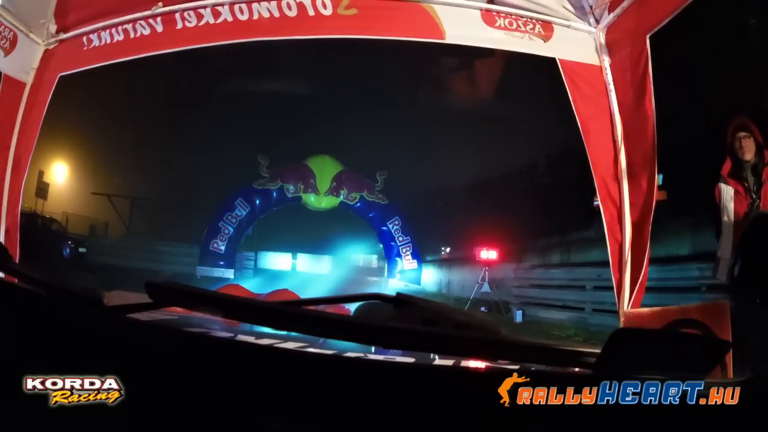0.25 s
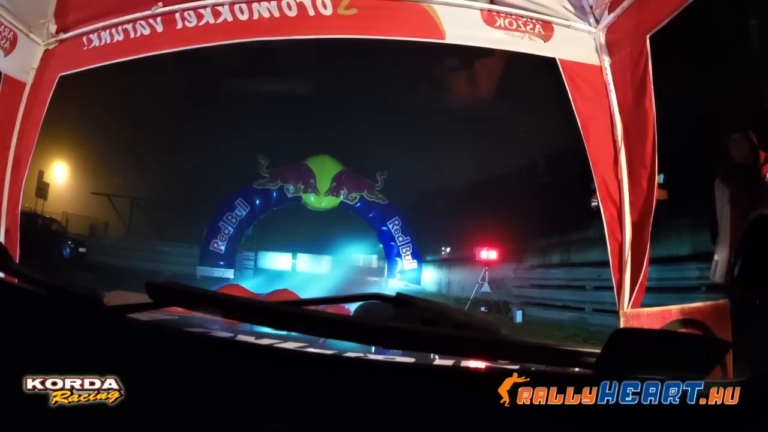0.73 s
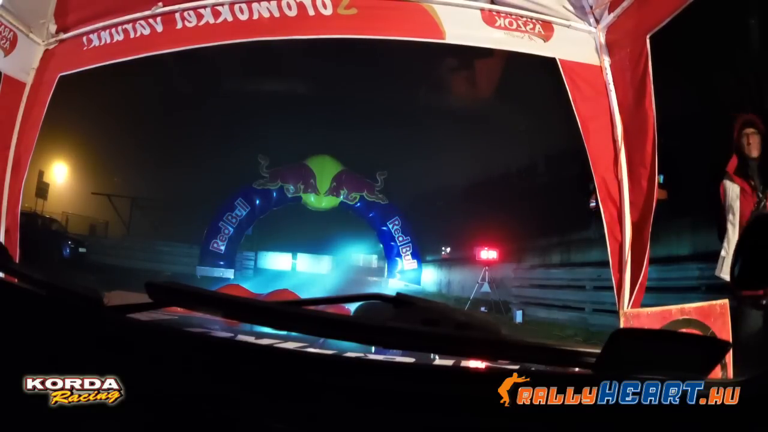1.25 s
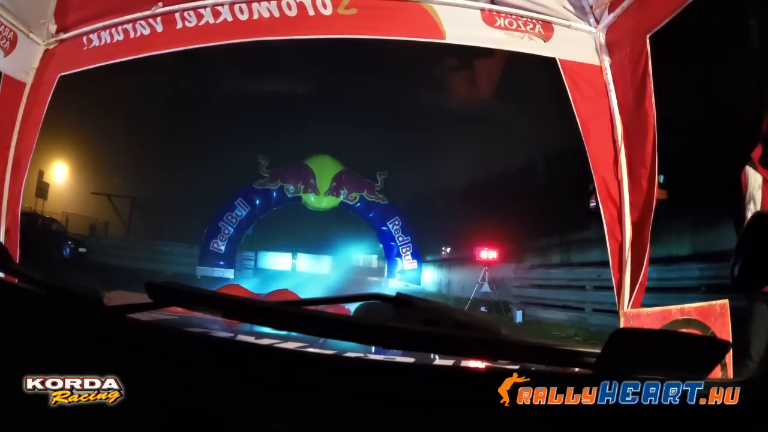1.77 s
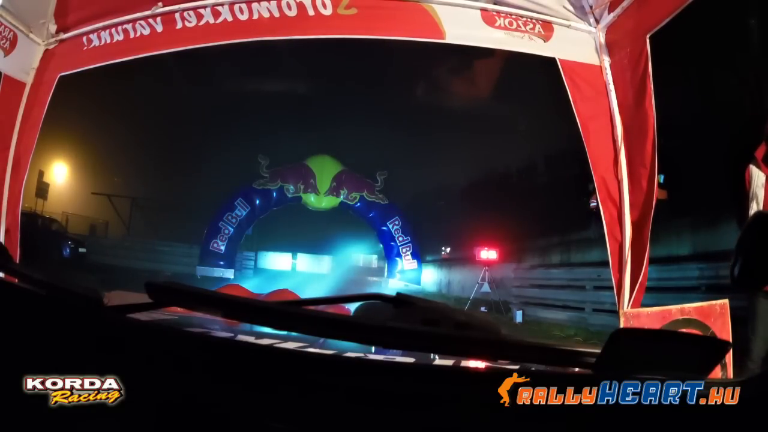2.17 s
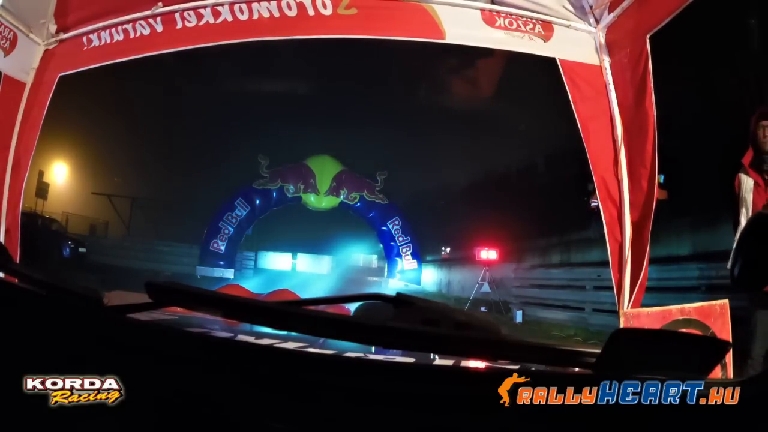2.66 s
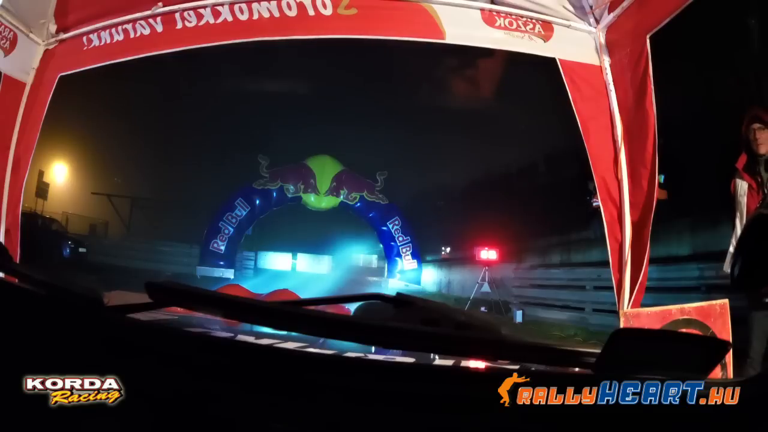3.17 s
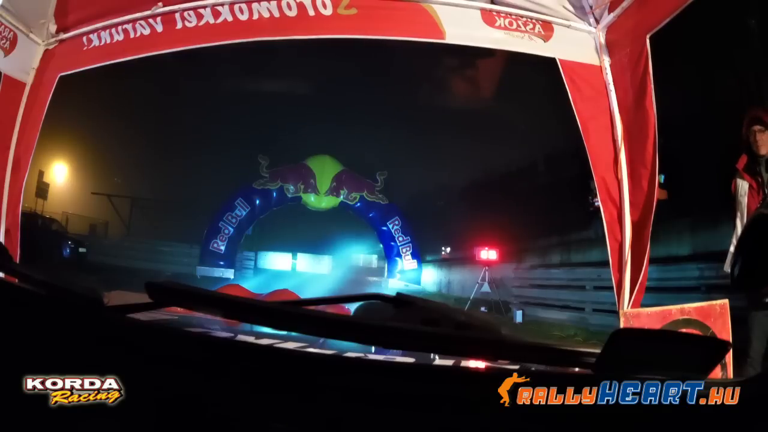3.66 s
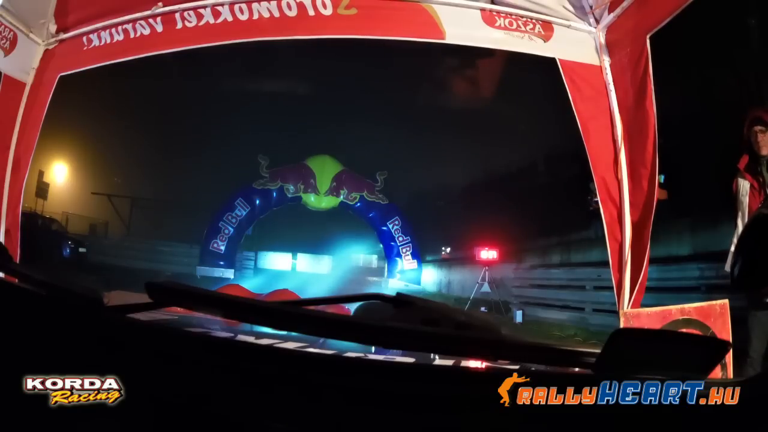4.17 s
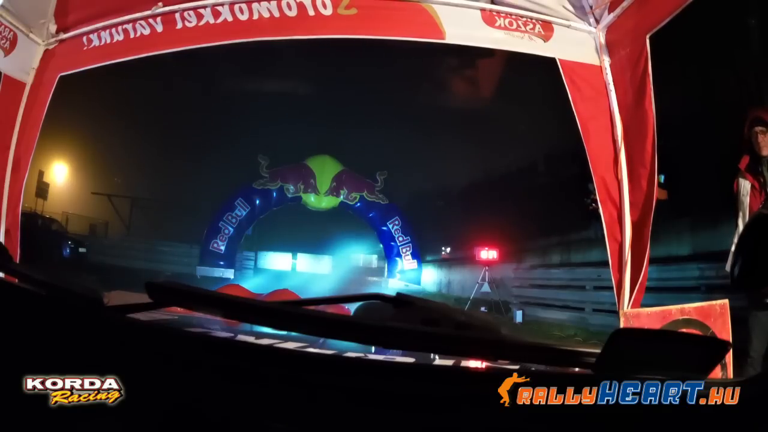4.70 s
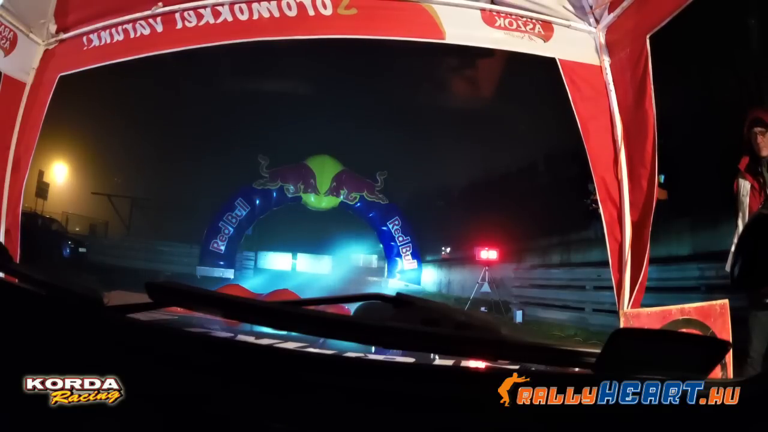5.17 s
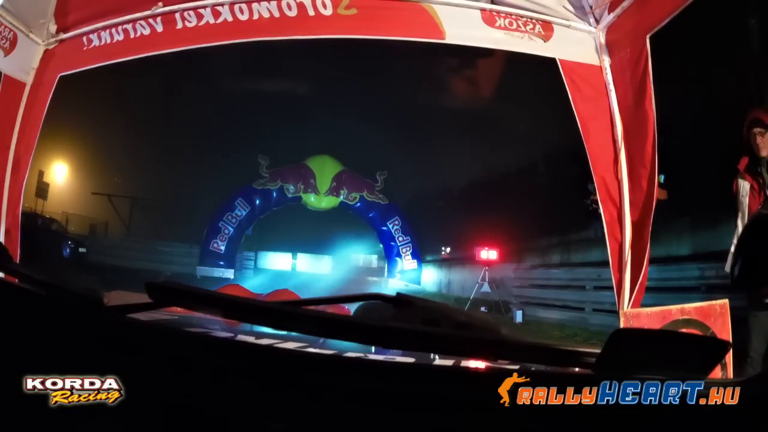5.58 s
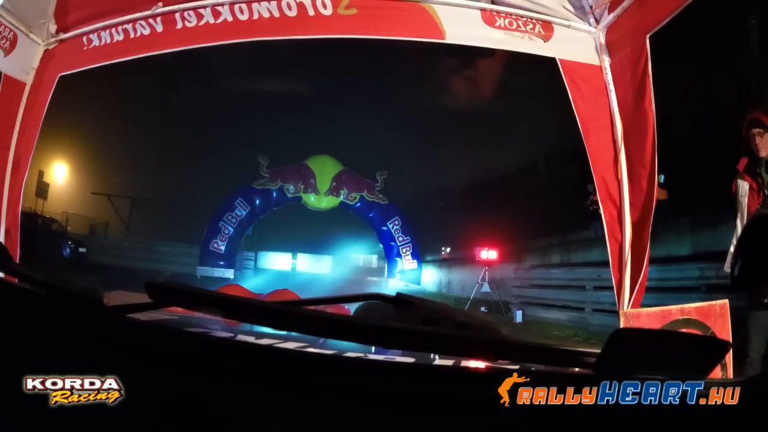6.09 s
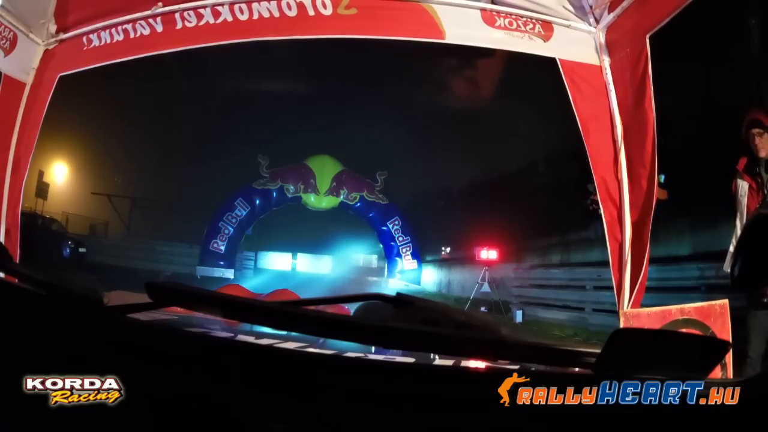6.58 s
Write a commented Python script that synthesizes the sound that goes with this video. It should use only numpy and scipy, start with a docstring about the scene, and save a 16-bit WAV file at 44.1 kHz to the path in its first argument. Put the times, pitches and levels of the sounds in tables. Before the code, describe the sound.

Inside a stationary rally car, a booming four-cylinder engine revs up and sags repeatedly, ending in a flat-out rev with loud backfires.

```python
"""Four-cylinder rally engine at the start line, heard inside the car's bare cabin.
Six throttle blips, then full throttle into the launch limiter; unburnt fuel pops and crackles.
The exhaust booms through the shell, upper orders ring the panels, valves and gears tick.
Faint intake whistle, ringing fittings and hiss lie behind. Peaks overload the microphone."""
import sys
import numpy as np
from scipy import signal
from scipy.fft import next_fast_len
from scipy.io import wavfile
from scipy.ndimage import uniform_filter1d, map_coordinates

SR = 44100
rng = np.random.default_rng(int(sys.argv[2]) if len(sys.argv) > 2 else 0)


def store_wav(level_fs):
    """Save 16-bit WAV to argv[1]."""
    pcm = np.round(np.clip(np.atleast_2d(level_fs), -1, 1) * 32767)
    wavfile.write(sys.argv[1], SR, pcm.T.astype(np.int16))


N = 301644
TIME = np.arange(N) / SR

# Throttle: t_open/s, climb/s, top firing rate/Hz, effort/dB, paired misfire share, t_run_down/s
BLIPS = [(0.0, 0.2, 212.4, -3.5, 0.2, 0.76), (1.05, .245, 238, 0, .7, 2.004),
         (2.2, .29, 222.2, -3.5, 0.1, 3.09), (3.325, .25, 233.5, -1.5, 0.9, 4.28),
         (4.425, .2, 231, -0.5, 0.4, 5.33), (5.41, .22, 236.2, -0.5, .8, 6.335)]
# Final opening: as BLIPS, without t_run_down
LAUNCH = (6.41, .3, 281, 2.0, 0.45)
# Coasting, two firings per crank turn: (t - t_run_down)/s, firing rate/Hz
RUN_DOWN = [(-.72, 239), (-.6, 219), (-.52, 206), (-.45, 206), (-.39, 195), (-.3, 180), (-.23, 175),
            (-.14, 154), (-.03, 141.5), (.04, 140), (.13, 123), (.3, 103)]
# Cabin response to the firing tone and its octave: firing rate/Hz, level/dB
BOOM_BY_RATE = [(103, -20.5), (112, -18), (124, -17.5), (136, -22), (143, -15), (154, -15), (166, -20),
                (173, -26), (180, -20), (191, -14.5), (201, -18), (218, -15), (238, -11), (272, -15)]
OCTAVE_BY_RATE = [(103, -23), (128, -17.5), (136, -17.5), (141, -23), (156, -29), (167, -20.5), (178, -22),
                  (190, -35), (215, -35.5), (238, -24), (272, -37)]
# Lope and bulkhead growl, throttle shut: firing rate/Hz, level/dB
LOPE_BY_RATE = [(103, -24), (126, -23.5), (135, -30), (150, -20.5), (178, -21.5), (192, -17.5),
                (207, -13.5), (238, -14.5)]
GROWL_BY_RATE = [(103, -30.5), (121, -34), (131, -22.5), (139, -29.5), (153, -27), (163, -22), (175, -26.5),
                 (192, -26.5), (215, -20.5), (238, -24)]
# Uneven firing: firing-rate multiple, level/dB (one weak cylinder), level/dB (every other one weak)
LOPE_ORDERS = [(.25, -12, -17.5), (.5, -5, 6.5), (.75, 5, -7), (1.25, -5, -8.5), (1.5, 1.5, -4.5),
               (1.75, -1.5, -6)]
# Upper orders: firing-rate multiple, level/dB
GROWL_ORDERS = [(2.5, 0.5), (3, 6.5), (3.5, -1), (4, 3.5), (4.5, -1.5), (5, 4.5), (5.5, -1.5), (6, 3.5),
                (6.75, 6), (7, 1), (7.5, 2.5), (8, 2), (9, 3), (10, 3.5), (11, 5.5), (12, 4.5)]
# Fuel firing in the exhaust: t/s, crack/dB, length/s, thump/dB
POPS = [(0.194, -39, .015, -14), (1.27, -30, .02, -22), (1.294, -23, .017, -10), (1.306, -20, 0.022, -14),
        (1.382, -33.5, .015, -13), (1.419, -33.5, .016, -11.5), (1.529, -31.5, 0.014, -15.5),
        (2.211, -39, .015, -20), (2.263, -31, .025, -13.5), (2.418, -46, .015, -14),
        (3.57, -37, 0.016, -11.5), (3.609, -22.5, .015, -9), (3.706, -22.5, 0.017, -3.5),
        (3.769, -27, 0.0085, -34.5), (3.797, -44, .015, -9), (4.644, -28, .014, -18.5),
        (4.71, -28, 0.014, -23), (4.82, -34, 0.014, -14), (5.523, -45, .015, -16.5),
        (5.616, -28, 0.027, -8.5), (5.754, -25, .02, -8.5), (5.869, -34, 0.0081, -10),
        (6.548, -40.5, .015, -16), (6.596, -14, .023, -12.5), (6.636, -19, 0.031, -4.5),
        (6.671, -11, .024, -28), (6.685, -7.5, .026, -14), (6.72, -22, .012, -37), (6.734, -8.5, .025, -18),
        (6.758, -6, 0.029, -12.5), (6.786, -6, 0.028, -11), (6.811, -7, 0.039, -10)]
# Resonances of cabin panels and small metal fittings: f/Hz, width/Hz, level/dB
PANEL_MODES = [(441.6, 9.1, 8.5), (524, 32, 5.5), (580.6, 14, 5.5), (682.6, 45, 5), (753, 15, 7),
               (795, 30, 7.5), (887, 16, 2.5), (961, 50, 5.5), (1040, 20, 2.5), (1041, 3.3, 6.5),
               (1072, 62, 7), (1220, 16, 4), (1247, 12, 4.5), (1325, 55, 7), (1537, 41, 3), (1629, 38, 9),
               (2150, 28, 6), (2183, 14, 2.5), (2556, 51, 5.5), (3588, 69, 10), (3860, 120, 6.5)]
FITTING_MODES = [(7700, 140, 7), (7990, 110, 0), (11490, 90, -2), (11800, 90, 2)]
# Spectral shapes: f/Hz, level/dB
LOPE_SPECTRUM = [(20, -16), (45, -19.5), (70, -10.5), (108, -5.5), (126, -7.5), (148, -1), (175, -6),
                 (250, 5.5), (305, -2.5), (338, 3), (368, -9.5), (550, -26), (1200, -72)]
GROWL_SPECTRUM = [(150, -47), (300, -5.5), (400, 2), (500, -3), (760, 0), (860, -4), (1080, -6),
                  (1350, -8.5), (1430, -14), (1620, -14.5), (1900, -23.5), (2800, -35.5), (5000, -69)]
POP_SPECTRUM = [(60, -22.5), (300, 3), (700, 3), (1300, -2), (2000, -7.5), (3800, -19.5), (5000, -30),
                (6500, -38.5), (9000, -60)]
SNAP_SPECTRUM = [(2000, -32), (4000, -4), (7000, -6), (11000, 3), (16000, -5)]
CLATTER_SPECTRUM = [(800, -23), (1700, 4), (2050, 0), (2600, 1), (3200, -4.5), (3700, -9), (4200, -21),
                    (4800, -24.5), (6500, -37), (10000, -43.5), (16000, -47)]
HISS_SPECTRUM = [(1000, 0), (6000, 0), (9000, -1), (16000, -2)]
# Microphone housing response: f/Hz, level/dB
HOUSING_RESPONSE = [(20, -.15), (3800, -.15), (6000, -3), (9000, -9), (16000, -15)]


def exhaust(firings, boom_cycles, rate_hz, revved, throttle, effort_db, top_paired):
    """Firing tone, octave and lope; each pop swells the tone."""
    thump_lag_s, thump_half_s, open_lope_db = .011, .012, -16
    thumps = sum(gain(db) * np.exp(-((TIME - t_s - thump_lag_s) / thump_half_s) ** 2)
                 for t_s, _, _, db in POPS)
    boom_gain = gain(lookup(BOOM_BY_RATE, rate_hz) + throttle + .72 * effort_db) + thumps
    lope_db = (1 - throttle) * lookup(LOPE_BY_RATE, rate_hz) + throttle * open_lope_db
    ragged = np.minimum(gain(lope_db + 14.5), 1)  # lope shakes the boom
    boom_gain *= gain(3 * ragged * wander(40))
    boom = np.sqrt(2) * boom_gain * np.cos(2 * np.pi * boom_cycles + .45 * ragged * wander(50))
    octave_db = lookup(OCTAVE_BY_RATE, rate_hz) + .5 * throttle
    octave = gain(octave_db) * flat_rms(order_tone(firings, 2, unrest=.33, unrest_hz=34))
    paired = np.clip(.31 + revved * (top_paired - .31), 0, 1)
    return boom + octave + gain(lope_db - 3) * lope(firings, paired)


def lope(firings, paired):
    """Unequal cylinders: tones between the firing orders, over gas rumble."""
    orders = sum(gain(one_db + paired * (two_db - one_db))
                 * order_tone(firings, multiple, unrest=.49, unrest_hz=22)
                 for multiple, one_db, two_db in LOPE_ORDERS)
    gas = puffs(firings, decay_cycles=.89, floor=.94, spread_db=1)
    tones, rumble = (unit_rms(shaped(x, LOPE_SPECTRUM)) for x in (orders, gas))
    return flat_rms(tones + .7 * rumble)


def growl(firings, rate_hz, revved):
    """Upper orders and gas puffs shake the panels; high revs break up the orders."""
    juddered = firings + .025 * revved * wander(45.04)
    orders = sum(gain(db) * order_tone(juddered, multiple, unrest=.7, unrest_hz=28)
                 for multiple, db in GROWL_ORDERS)
    gas = puffs(firings, decay_cycles=.3, floor=.45, spread_db=2.5)
    tones, rasp = (unit_rms(shaped(x, GROWL_SPECTRUM, PANEL_MODES)) for x in (orders, gas))
    limiter_cut = .65 * ramp(rate_hz, from_hz=245, full_hz=275)  # cut sparks thin the orders
    return flat_rms((1 - limiter_cut) * (1 - .11 * revved) * tones + rasp, samples=1501)


def pops(firings, rate_hz, effort_db):
    """Unburnt fuel: one shock front per firing, trailed by gas; random crackle at high revs."""
    attack_s, crackle_db_per_octave = .0025, 30.5
    crackle_db = -39 + effort_db + crackle_db_per_octave * np.log2(rate_hz / 220)
    envelope = gain(crackle_db + 5 * np.minimum(wander(49.93), 2))
    for t_s, db, length_s, _ in POPS:
        age_s = np.maximum(TIME - t_s, 0)
        envelope += gain(db) * (1 - np.exp(-age_s / attack_s)) * np.exp(-(age_s / length_s) ** 2)
    fronts = np.diff(np.floor(firings + .03 * wander(200)), prepend=0) * gain(2 * wander(200))
    gas = puffs(firings, decay_cycles=.3, floor=.12, spread_db=2)
    crack = flat_rms(shaped(unit_rms(fronts) + gas, POP_SPECTRUM, PANEL_MODES), samples=601)
    snap = unit_rms(shaped(fronts * gain(4 * wander(200)), SNAP_SPECTRUM))
    return envelope * crack + gain(-39.5) * envelope ** 1.05 * snap


def clatter(firings):
    """Valves and gears tick in step with the firings."""
    ticks = puffs(firings, decay_cycles=.3, floor=.9, spread_db=3.5)
    return flat_rms(shaped(ticks, CLATTER_SPECTRUM, PANEL_MODES))


def intake_whistle(rate_hz, centre_hz=4300, width_hz=380, db_per_octave=16.5):
    """Rushing intake air: narrow hiss, louder with revs."""
    t = TIME[:2048]
    ring = t * np.exp(-np.pi * width_hz * t) * np.sin(2 * np.pi * centre_hz * t)
    return gain(-69.5 + db_per_octave * np.log2(rate_hz / 200)) * noise_through(ring)


def fittings():
    """Vibration keeps small metal parts ringing."""
    t = TIME[:4096]
    ring = sum(gain(db) * np.exp(-np.pi * width_hz * t) * np.sin(2 * np.pi * f_hz * t)
               for f_hz, width_hz, db in FITTING_MODES)
    return noise_through(ring)


def hiss():
    """Steady broadband floor."""
    return unit_rms(shaped(rng.standard_normal(N), HISS_SPECTRUM))


def driver(idle_hz=102.95, sag_hz_per_s=110, throttle_s=.016):
    """Each rev climbs from the current rate and sags; blips then join the run-down."""
    rate_hz = np.full(N, idle_hz)
    throttle, effort_db, paired = np.zeros((3, N))
    for open_s, climb_s, top_hz, db, share, run_down_s in BLIPS + [(*LAUNCH, np.inf)]:
        after = TIME >= open_s
        from_hz, t = rate_hz[after][0], TIME[after]
        progress = np.minimum((t - open_s) / climb_s, 1) ** 1.2  # soft start
        pull_hz = from_hz + (top_hz - from_hz) * np.sin(np.pi / 2 * progress)
        pull_hz -= sag_hz_per_s * np.maximum(t - open_s - climb_s, 0)
        coast_hz = np.interp(t - run_down_s, *np.transpose(RUN_DOWN), left=np.inf)
        held = np.logical_and.accumulate(pull_hz < coast_hz)
        rate_hz[after] = np.where(held, pull_hz, coast_hz)
        throttle[after], effort_db[after], paired[after] = held, db, share
    return rate_hz, *(smooth(x, throttle_s) for x in (throttle, effort_db, paired))


def order_tone(firings, multiple, unrest, unrest_hz):
    """One engine order; uneven combustion shakes level and phase."""
    phase = 2 * np.pi * (multiple * firings + rng.random())
    return (1 + unrest * wander(unrest_hz)) * np.cos(phase) + unrest * wander(unrest_hz) * np.sin(phase)


def puffs(firings, decay_cycles, floor, spread_db):
    """One noise burst of random strength per firing, over steady noise."""
    strength = gain(spread_db * rng.standard_normal(2048))[firings.astype(int)]
    envelope = floor + strength * np.exp(-(firings % 1) / decay_cycles)
    return unit_rms(envelope * rng.standard_normal(N))


def shaped(x, spectrum, modes=()):
    """Minimum-phase filter: smooth spectrum plus ringing modes."""
    f_hz = np.linspace(0, SR / 2, 8193)
    points_hz, points_db = np.transpose(spectrum)
    level_db = np.interp(np.log(f_hz + 1), np.log(points_hz), points_db)
    for centre_hz, width_hz, lift_db in modes:
        level_db += lift_db / (1 + (2 * (f_hz - centre_hz) / width_hz) ** 2)
    log_gain = np.log(gain(np.r_[level_db, level_db[-2:0:-1]]))
    taps = np.fft.ifft(np.exp(np.conj(signal.hilbert(log_gain)))).real[:4096]
    return signal.oaconvolve(x, taps)[:N]


def noise_through(ring):
    """Noise-driven resonator, rms 1."""
    return unit_rms(signal.oaconvolve(rng.standard_normal(N), ring)[:N])


def wander(rate_hz):
    """Smooth random curve, rms 1."""
    coarse_s = TIME[::32]
    curve = map_coordinates(rng.standard_normal(4096), [coarse_s * rate_hz], order=3, mode="wrap")
    return unit_rms(np.interp(TIME, coarse_s, curve))


def smooth(x, width_s):
    """Gaussian smoothing of a control."""
    bell = np.exp(-8 * (np.arange(-6000, 6001) / SR / width_s) ** 2)
    return signal.fftconvolve(np.pad(x, 6000, "edge"), bell / bell.sum(), "valid")


def flat_rms(x, samples=3001):
    """Running rms held at 1; fast grain stays."""
    power = uniform_filter1d(uniform_filter1d(x ** 2, samples), samples)
    return x / np.sqrt(abs(power) + 1e-12)


def unit_rms(x):
    return x / np.sqrt(np.mean(x ** 2) + 1e-20)


def ramp(rate_hz, from_hz, full_hz):
    return np.clip((rate_hz - from_hz) / (full_hz - from_hz), 0, 1)


def lookup(table, rate_hz):
    return np.interp(rate_hz, *np.transpose(table))


def gain(db):
    return 10 ** (np.asarray(db) / 20)


def scene():
    """One crankshaft and throttle drive all engine layers."""
    flywheel_s, growl_build_s, cabin_lag_s = .08, .057, .018
    boom_hz, throttle, effort_db, paired = driver()
    rate_hz = throttle * boom_hz + (1 - throttle) * smooth(boom_hz, flywheel_s)
    # The cabin takes time to ring up, so the firings lead the boom.
    firing_hz = uniform_filter1d(np.interp(TIME + cabin_lag_s, TIME, rate_hz), size=2205)
    firings, boom_cycles = np.cumsum(firing_hz) / SR, np.cumsum(boom_hz) / SR
    revved = ramp(rate_hz, from_hz=200, full_hz=207)
    effort_db = effort_db * revved
    load = smooth(throttle, growl_build_s)
    pull_db = -20.5 + 5 * np.log2(rate_hz / 200)
    sputter_db = 1.34 * revved * wander(24.03)  # uneven combustion
    growl_db = (1 - load) * lookup(GROWL_BY_RATE, rate_hz) + load * pull_db + effort_db + sputter_db
    mix = gain(growl_db) * growl(firings, rate_hz, revved)
    mix += gain(-47 + .92 * (growl_db + 25.5)) * clatter(firings)
    mix += gain(-60 + .55 * growl_db) * fittings()
    mix += gain(-75.5) * hiss()
    mix += exhaust(firings, boom_cycles, rate_hz, revved, throttle, effort_db, paired)
    mix += intake_whistle(rate_hz)
    mix += pops(firings, rate_hz, effort_db)
    return mix[None]


def record(dry):
    """Microphone soft overload, housing treble loss, hard clip, low-pass."""
    drive_db, ceiling, knee, cutoff_hz = .64, 1.02, 6.1, 15800
    driven = gain(drive_db) * dry[0]
    rounded = driven / (1 + abs(driven / ceiling) ** knee) ** (1 / knee)
    clipped = np.clip(shaped(rounded, HOUSING_RESPONSE), -.985, .985)
    lowpass = signal.firwin(511, cutoff_hz, window=("kaiser", 9), fs=SR)
    return signal.oaconvolve(clipped, lowpass, "same")[None]


dry = scene()
out = record(dry)
store_wav(out)
```